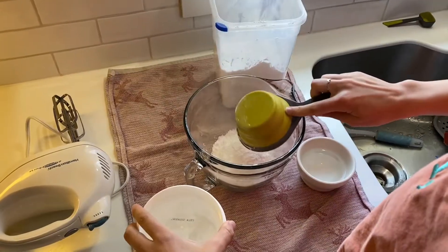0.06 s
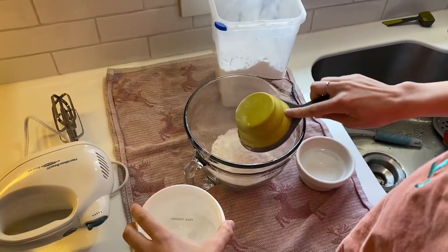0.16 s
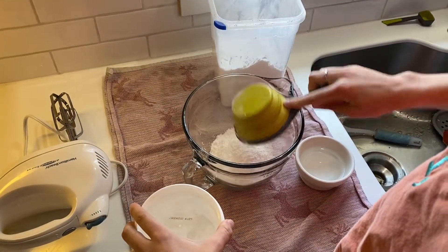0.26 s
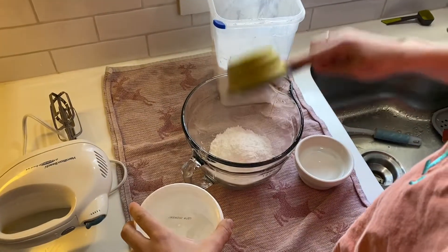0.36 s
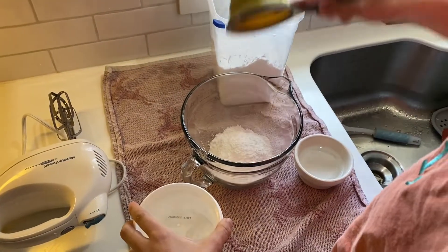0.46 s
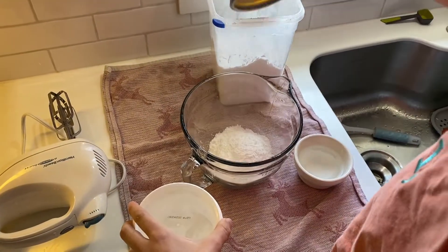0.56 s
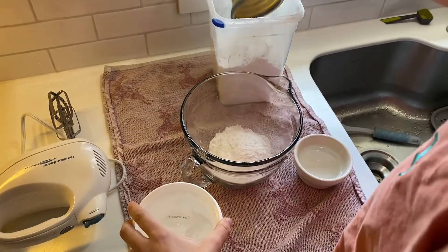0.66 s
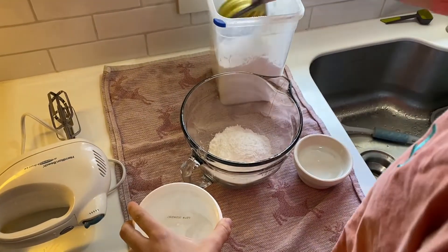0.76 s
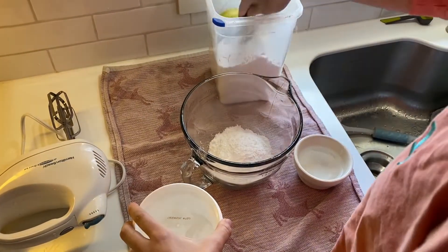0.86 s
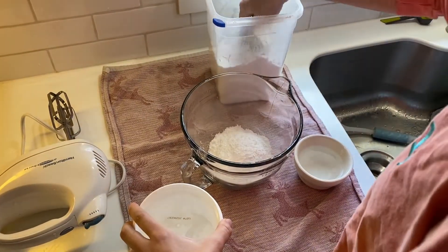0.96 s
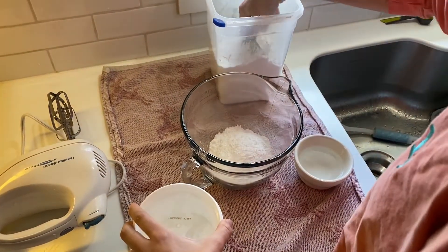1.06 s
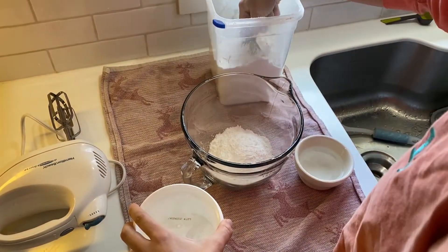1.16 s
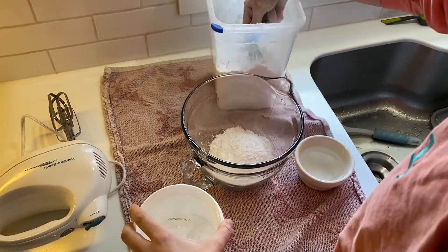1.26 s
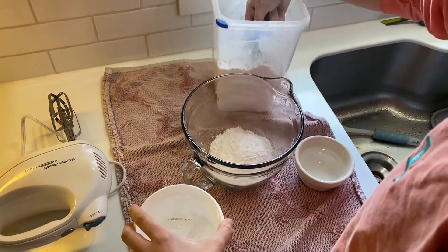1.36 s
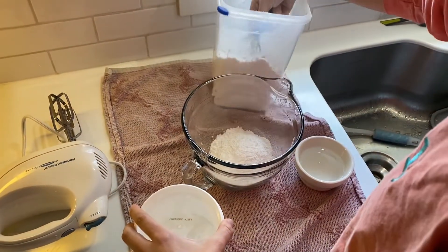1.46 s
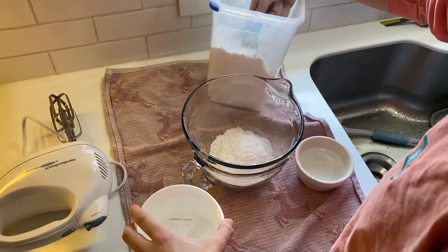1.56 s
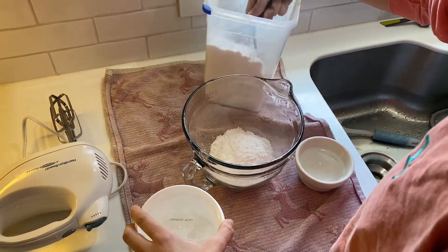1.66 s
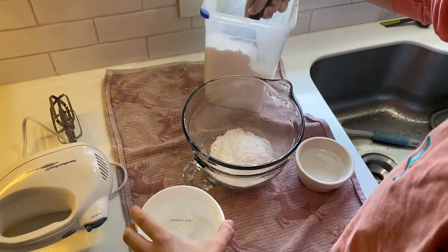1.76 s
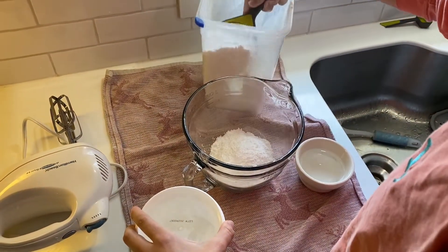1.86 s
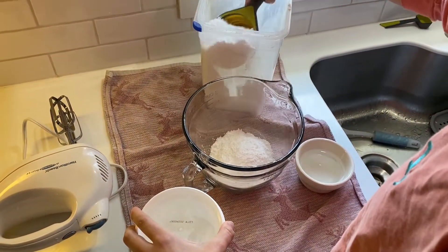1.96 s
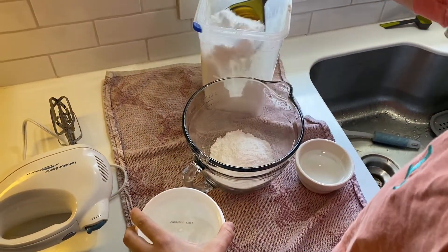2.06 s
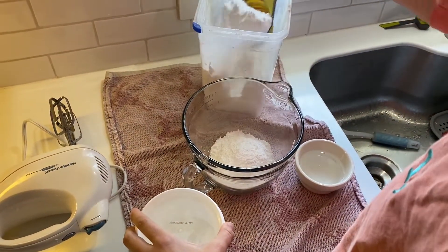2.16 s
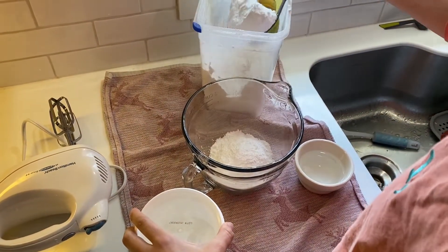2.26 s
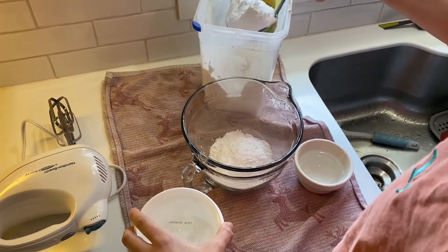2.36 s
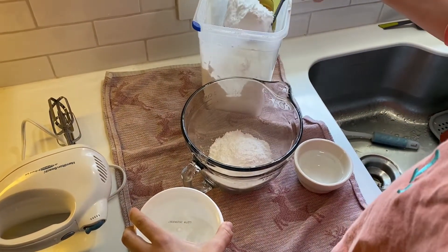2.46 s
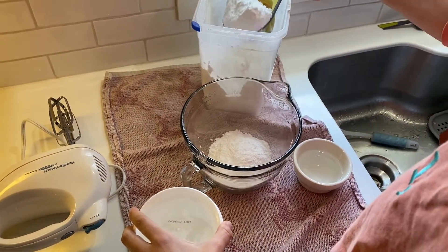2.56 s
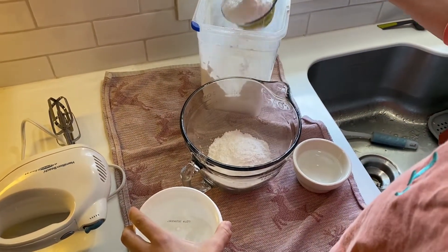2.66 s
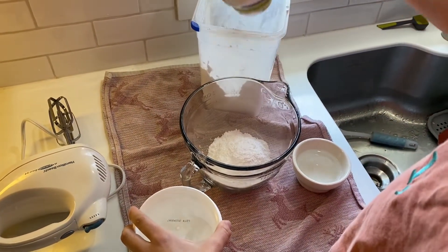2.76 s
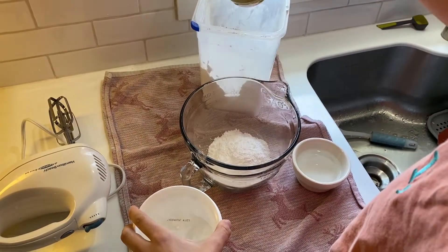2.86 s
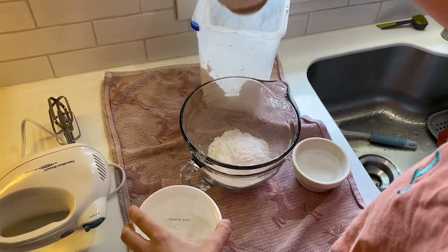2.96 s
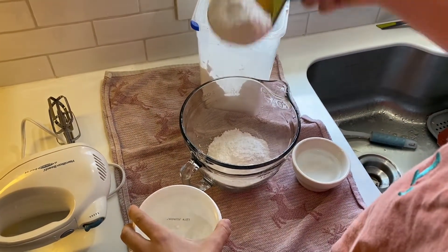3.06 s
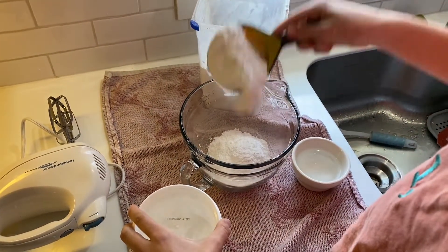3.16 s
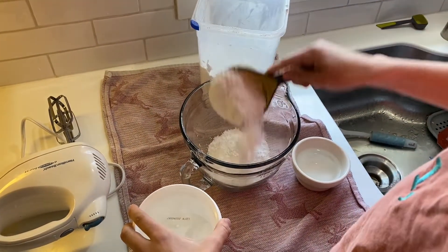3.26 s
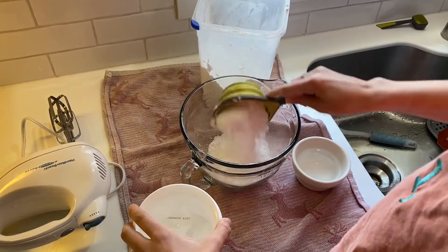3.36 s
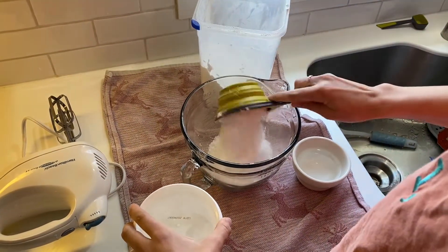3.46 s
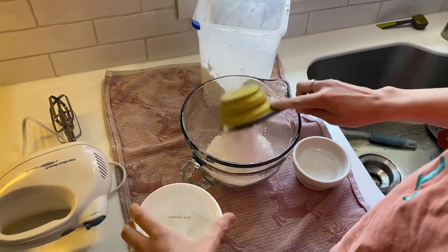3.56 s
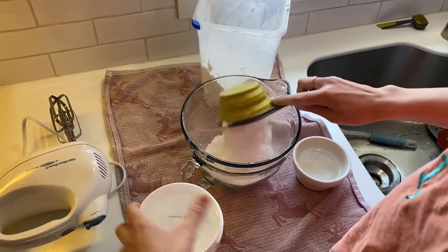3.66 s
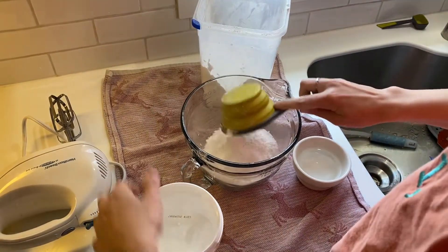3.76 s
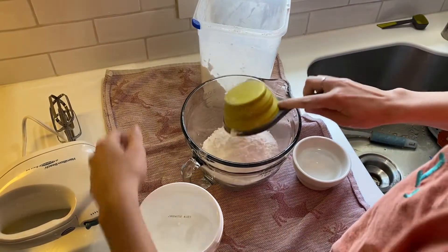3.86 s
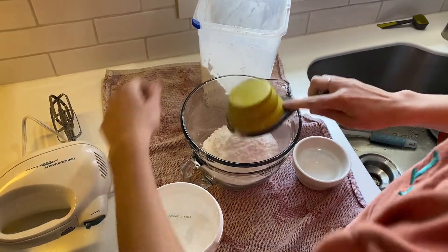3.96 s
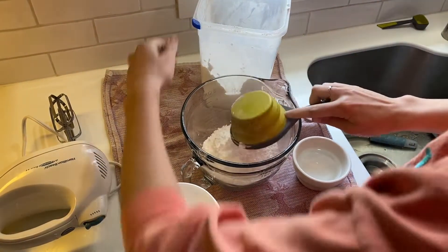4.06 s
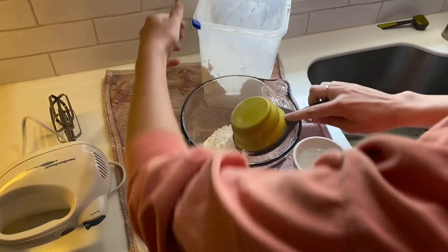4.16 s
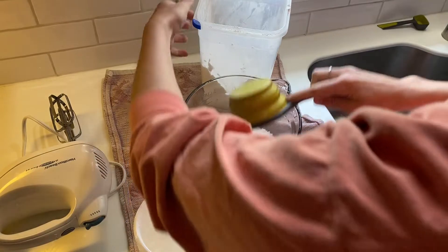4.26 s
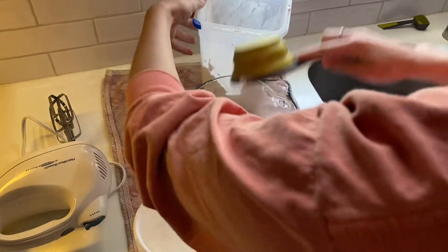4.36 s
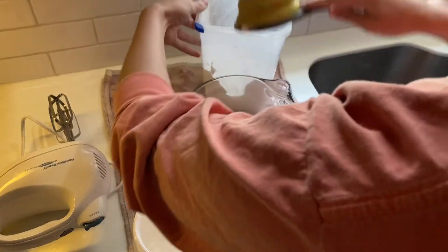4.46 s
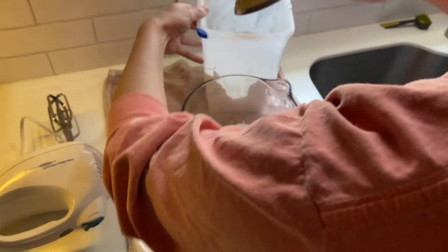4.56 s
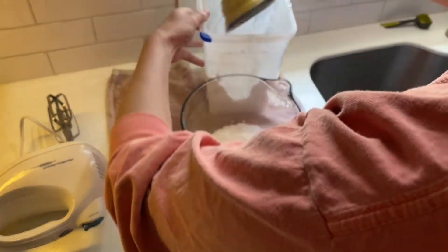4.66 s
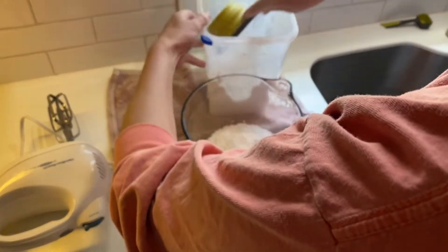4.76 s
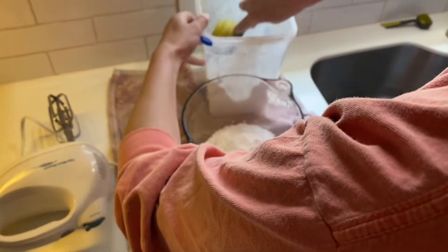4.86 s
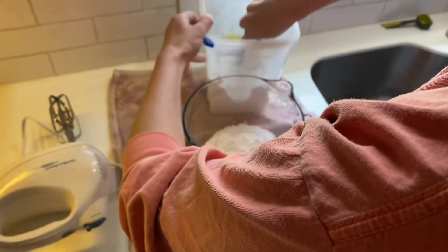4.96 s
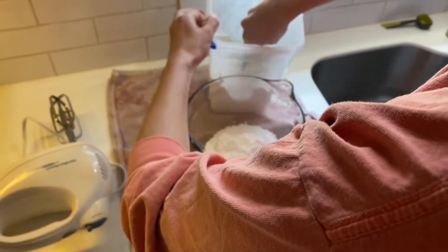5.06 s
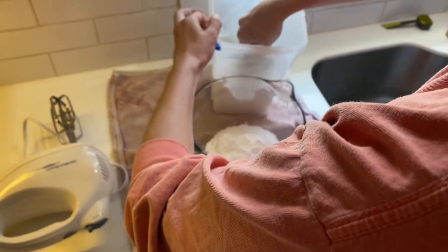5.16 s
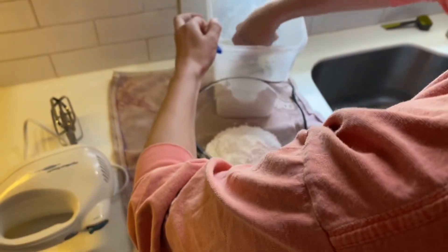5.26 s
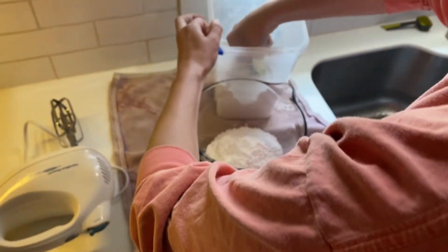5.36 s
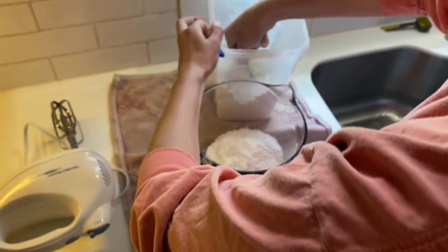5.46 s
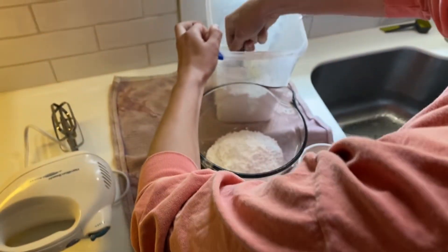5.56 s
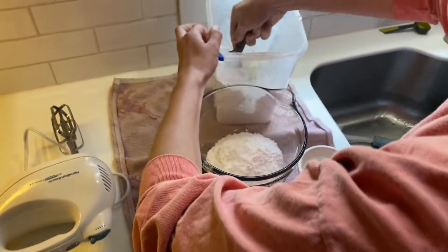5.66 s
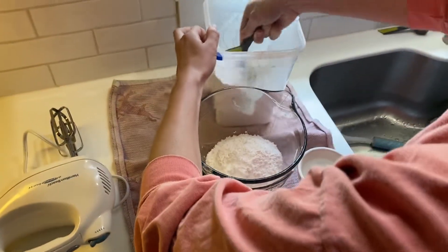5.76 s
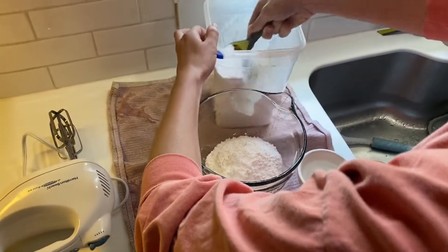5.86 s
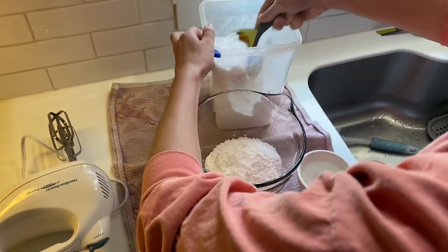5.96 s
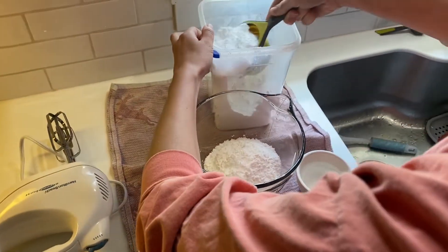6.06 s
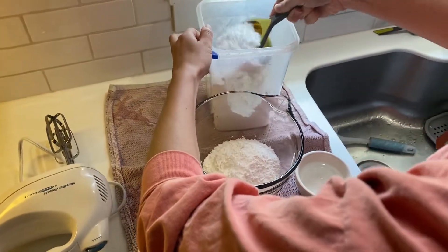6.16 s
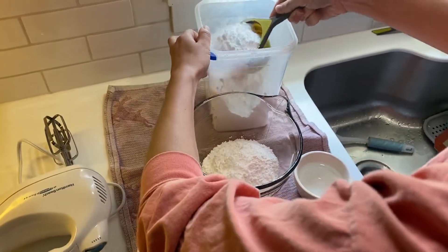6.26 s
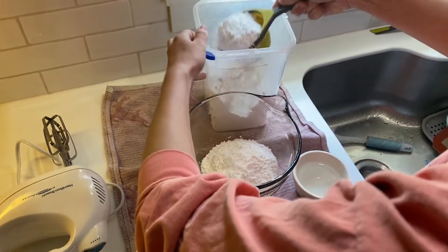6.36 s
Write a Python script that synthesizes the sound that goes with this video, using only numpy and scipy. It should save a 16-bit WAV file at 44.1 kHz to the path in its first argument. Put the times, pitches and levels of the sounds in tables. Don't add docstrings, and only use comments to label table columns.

```python
import sys
import numpy as np
from scipy import signal
from scipy.fft import rfft, irfft, next_fast_len
from scipy.io import wavfile
from scipy.ndimage import uniform_filter1d

SR = 44100
rng = np.random.default_rng(int(sys.argv[2]) if len(sys.argv) > 2 else 0)


def boost_factor(decibels):
    exponent = np.asarray(decibels, float) / 20
    return 10 ** exponent


def to_wav(sig):
    pcm = np.clip(np.atleast_2d(sig), -1, 1) * 32767
    pcm = np.round(pcm).astype(np.int16)
    wavfile.write(sys.argv[1], SR, pcm.T)


N = 282240
M = next_fast_len(N + 4096)
HZ = np.fft.rfftfreq(M, 1 / SR)

# pitch in Hz, time to fade by 60 dB in seconds,
# left minus right in dB, left lead in radians, level in dB.
COUNTER_MODES = [(47.2, 0.6, 0.5, 0.17, -1), (72.8, 0.43, 3, 0.061, 4), (83, 0.3, 2, .05, -2),
                 (112.2, 0.65, 4, .05, -5.5)]
# pitch in Hz, level in dB per Hz.
HISS_COLOUR = [(2000, -15), (3500, -9.5), (5200, -4), (6600, -4), (8200, -11), (9400, -4), (11400, -4.5),
               (12300, -4.5), (15000, 1.5), (16200, -27.5)]
RING_WET_DB = -7.5


def along(table):
    hz, value = np.transpose(table)
    return np.interp(np.log(HZ + 1), np.log(hz + 1), value)


def unit(x):
    return x / np.sqrt(np.mean(x ** 2))


def noise(colour, source=None):
    if source is None:
        source = rng.standard_normal(N)
    return unit(irfft(rfft(source, M) * boost_factor(along(colour)), M)[:N])


def walk(rate):
    hold = int(SR / rate)
    levels = np.repeat(rng.standard_normal(N // hold + 1), hold)[:N]
    return unit(uniform_filter1d(levels, hold))


def add(out, s, sound):
    i = int(s * SR)
    out[..., i:i + sound.shape[-1]] += sound[..., :N - i]


def ring(modes, db, rise_s, last=0.93, waver_db=0):
    waver_rate, waver_full_hz = 35, 2500
    hz, t60, pan_db, lead = np.transpose(modes)[:4]
    t = np.arange(int(min(last * max(t60), .62) * SR)) / SR
    turn = np.outer(2j * np.pi * hz - np.log(1000) / (last * t60), t)
    if waver_db:
        knots = np.arange(1, waver_rate)
        luck = rng.standard_normal((len(hz), len(knots), 2)) @ [1, 1j]
        luck = luck * np.minimum(hz / waver_full_hz, 1)[:, None] ** 2
        between = np.clip(1 - np.abs(t * waver_rate - knots[:, None]), 0, 1)
        turn = turn + waver_db * np.log(10) / 20 * luck @ between
    weight = np.array([boost_factor(db + side * pan_db / 2) * np.exp(.5j * side * lead) for side in (1, -1)])
    return (weight @ np.exp(turn)).imag * (1 - np.exp(-t / rise_s))


def bursts(times, db, rise_s, t60):
    out, t = np.zeros(N), np.arange(SR // 5) / SR
    shape = (1 - np.exp(-t / rise_s)) * boost_factor(-60 * t / t60)
    for s, gain in zip(times, boost_factor(db)):
        add(out, s, gain * shape)
    return out


def ports(x):
    # pitch in Hz, left lead in radians.
    port_lead = [(20, 0), (430, .3), (1200, 1.1), (2400, .7), (4500, 1.5), (7000, 1.7), (9300, 1.6),
                 (10400, .3), (11600, -.4), (12800, -2.4), (16000, -2.6)]
    turn = np.exp(.5j * along(port_lead))
    left = irfft(rfft(x, M) * turn, M) * boost_factor(2.05)
    right = irfft(rfft(x, M) / turn, M) * boost_factor(1.0)
    return np.array([left, right])[:, :N]


def room(x):
    # pitch in Hz, time to fade by 60 dB in seconds.
    echo_t60 = [(100, 0.39), (500, 0.39), (2000, 0.37), (6000, 0.34), (14000, 0.23)]
    at_hz, fade_s = np.transpose(echo_t60)
    t, tail = np.arange(SR // 2) / SR, 0
    for hz in 90 * 2. ** np.arange(8):
        band = signal.butter(2, [hz / 1.41, hz * 1.41], "bandpass", fs=SR, output="sos")
        mid, side = rng.standard_normal((2, len(t)))
        both = mid + min(hz / 900, 1) * side * np.array([[1], [-1]])
        t60 = np.interp(np.log(hz), np.log(at_hz), fade_s)
        tail = tail + signal.sosfilt(band, both) * boost_factor(-60 * t / t60)
    tail = tail * np.clip(t / 0.011, 0, 1)
    tail = tail / np.sqrt(np.sum(tail ** 2) / 2)
    return signal.fftconvolve(x[None], tail, axes=1)[:, :N]


def kitchen():
    # pitch in Hz, level in dB per Hz.
    air_colour = [(15, -52), (28, -27), (55, -1), (120, -8), (240, -6), (400, -13.5), (600, -20.5),
                  (1000, -24), (1400, -31.5), (1800, -41.5), (3000, -44.5), (6500, -48.5), (9000, -55),
                  (12000, -56), (14000, -64)]
    # pitch in Hz, likeness from 0 to 1.
    air_alike = [(40, 0.4), (130, 1), (290, 0.4), (640, 0.05), (16000, 0)]
    # pitch in Hz, rms level in dB, width in Hz.
    hums = [(63, -67.5, 11), (237.7, -61.5, 6.6), (608, -81, 0.5)]
    # start in seconds, end in seconds, level in dB.
    fan_runs = [(0.207, 1.65, -68.5), (2.37, 3.5, -64.5), (4.665, 6.6, -65.5)]
    fan_hz, fan_waver_hz, fan_fade_s, fan_idle_db = 398, 1.8, 0.13, -80.5

    t = np.arange(N) / SR
    alike = np.clip(along(air_alike), 0, 1)
    spectra = rfft(rng.standard_normal((2, M))) * boost_factor(along(air_colour))
    mid, side = spectra * np.sqrt([1 + alike, 1 - alike])
    air = unit(irfft(np.array([mid + side, mid - side]), M)[:, :N])
    sound = air * boost_factor(-58 + 0.72 * walk(2.0))

    for hz, db, width_hz in hums:
        waver = np.cumsum(width_hz / 2 * walk(8.2)) / SR
        sound = sound + np.sqrt(2) * boost_factor(db + 2.2 * walk(6.6)) * np.sin(2 * np.pi * (hz * t + waver))

    fan_db = fan_idle_db
    for start, end, db in fan_runs:
        present = np.clip(np.minimum(t - start, end - t) / fan_fade_s + .5, 0, 1)
        fan_db = fan_db + (db - fan_idle_db) * present
    cycles = np.cumsum(fan_hz + fan_waver_hz * walk(3.4)) / SR
    sound = sound + np.sqrt(2) * boost_factor(fan_db + 2.9 * walk(2.7)) * np.sin(2 * np.pi * cycles)
    return sound * boost_factor(np.array([[.7], [-.7]]))


def taps():
    # start in seconds, then crack, edge, clank and foot levels in dB.
    rim_taps = [
        (.0015, -17.5, -28.5, -26, -17),
        (0.1431, -14.5, -30, -27, -13),
        (3.5859, -20, -43, -30.5, -15.5),
        (4.035, -31.5, -51, -47.5, -22),
        (4.122, -20.5, -36.5, -30, -13),
    ]
    # pitch in Hz, time to fade by 60 dB in seconds.
    bowl = [(581.5, .72), (620, .55), (1472.5, .8), (1501, .62), (2628.5, .4), (2696, .36)]
    # pitch in Hz, time to fade by 60 dB in seconds.
    cup = [(3784, .31), (4235, .26), (4776, .43), (6099, .18), (6444, .22)]
    # pitch in Hz, time to fade by 60 dB in seconds,
    # left minus right in dB, left lead in radians.
    shimmer = [(1038, .25, 3, .6), (1657, .22, 1, -1.4), (1720, .22, -3, 1.6), (4288, .18, -6, -.6),
               (5515, .24, 0, .2), (5865, .33, 3, 1.3), (6200, .25, -6, -1.9), (6729, .27, 0, -1.1),
               (7600, .26, -5, -.9), (7720, .22, -6, .3), (8270, .18, 0, 3.1), (8680, .2, 0, 3.0),
               (8882, .18, -4, 1.6), (9315, .2, -2, 1.5), (9410, .19, -2, 1.4), (9510, .2, 0, 1.7),
               (10400, .15, 0, 0), (10800, .21, 0, 0), (11370, .1, 0, 0), (11750, .19, -3, -.8),
               (12350, .14, 0, -2.2), (4795, .4, -4, 1.9), (6472, .22, -2, -.4), (7642, .25, -2, .1)]
    struck_db = [(-42, -51, -45, -71, -57), (-42, -43, -43, -50, -48), (-46, -33, -42, -52, -49),
                 (-31, -34, -43, -38, -35), (-36, -57, -39, -62, -48), (-52, -30.5, -37, -39, -32),
                 (-40, -38, -55, -57, -43), (-44, -43, -62, -64, -50), (-66, -52, -67, -60, -51),
                 (-39, -44, -50, -69, -52), (-42, -42, -56, -67, -55)]
    shimmer_struck_db = [(-42, -45, -49, -53, -48), (-43, -41, -55, -61, -45), (-45, -39, -60, -60, -48),
                         (-45, -46, -53, -58, -41), (-48, -47, -56, -77, -50), (-54, -53, -57, -94, -72),
                         (-62, -53, -60, -66, -53), (-52, -49, -56, -70, -63), (-58, -54, -68, -67, -58),
                         (-55, -62, -57, -72, -63), (-75, -51, -78, -84, -66), (-71, -46, -68, -72, -63),
                         (-66, -64, -65, -75, -59), (-58, -54, -74, -79, -66), (-57, -67, -76, -87, -110),
                         (-62, -53, -65, -86, -90), (-55, -49, -73, -88, -57), (-53, -50, -74, -120, -70),
                         (-60, -47, -65, -80, -96), (-70, -64, -75, -92, -81), (-62, -59, -72, -86, -70),
                         (-68, -62, -74, -72, -54), (-55, -53, -58, -70, -51), (-46, -61, -75, -77, -63)]
    struck_pan_db = [(0, -7, -1, 3, 1), (10, 5, 0, -4, 4), (1, 4, 8, 12, 12), (1, -3, 0, 1, 0),
                     (8, -4, 6, 12, 1), (-1, 0, 2, -2, -6), (-3, -3, 2, -2, -1), (-1, -4, -12, -4, -12),
                     (-7, -7, 9, -4, 10), (1, -3, 0, 9, 5), (2, 4, 2, -2, 0)]
    struck_lead = [(.7, 1, -.1, 1.6, .4), (.1, -2.4, .3, 1, 2.2), (-2.4, -1.2, -.6, -.7, -2.6),
                   (1.1, .6, 1.6, 1.2, 1.2), (1.2, 2.9, -1.2, -2.4, 2.4), (.9, .1, .5, .8, 1.2),
                   (0, 0, -1.5, 2.1, 1.7), (1.3, 1.2, 0, -1.9, 2), (-1.1, 1.5, 2.5, 2.1, 2),
                   (-.7, -1.9, -1.8, -2.3, -.9), (-1.5, .5, -.2, .2, .7)]
    ring_length = [1, 1, .92, 1, .8]
    clank = [(4206, 0.03, -10, .8, 1.5), (2675, 0.042, 0.5, .5, -8.5), (4780, .05, -4, 1, -15),
             (6300, 0.063, 0, .5, -16), (7660, 0.049, -4, -0.71, -20), (9340, .035, -1.5, 1.6, -16.5),
             (10810, .03, -0.5, 0, -18.5), (11550, 0.046, 0.5, 0, -23.5)]
    foot = [(198, 0.087, 2, 0.083, -18), (230, 0.14, 2, 0.092, -36), (355, 0.2, 2, .2, -26.5)]
    # pitch in Hz, level in dB per Hz.
    crack_colour = [(90, -19), (200, -14.5), (330, -15.5), (510, 0), (1000, -3), (1600, -3), (2100, -10),
                    (3300, -20.5), (5200, -25), (7500, -34), (11000, -67.5)]
    # pitch in Hz, level in dB per Hz.
    edge_colour = [(2500, -12), (3300, -9.5), (4500, -9), (7000, -4), (8200, -14), (11000, -18.5),
                   (12500, -26.5), (13000, -62.5)]
    # delay in seconds, level in dB.
    chatter = [
        (0, 0),
        (.0032, 0),
        (.0056, 0),
        (.009, -5.5),
    ]
    waver_db, stop_t60 = 3.5, .012

    out, rings = np.zeros((2, N)), np.zeros((2, N))
    t = np.arange(N) / SR
    strong_db, weak_db = np.transpose(struck_db) + 1.5, np.transpose(shimmer_struck_db)
    pans, leads = np.transpose(struck_pan_db), np.transpose(struck_lead)
    for k, (s, crack_db, _, clank_db, foot_db) in enumerate(rim_taps):
        strong = np.column_stack([bowl + cup, pans[k], leads[k]])
        rings = rings * boost_factor(-60 * np.clip((t - s) / stop_t60, 0, 2))
        add(rings, s, ring(strong, strong_db[k], 0.001, ring_length[k], waver_db))
        add(rings, s, ring(shimmer, weak_db[k], 0.001, ring_length[k], waver_db))
        add(out, s, ring(clank, np.array(clank)[:, 4] + clank_db + 3.5, 0.00075))
        add(out, s, ring(COUNTER_MODES, np.array(COUNTER_MODES)[:, 4] + crack_db - 19.5, .008))
        add(out, s, ring(foot, np.array(foot)[:, 4] + foot_db, 0.001))

    s, crack_db, edge_db, *_ = np.transpose(rim_taps)
    rattle = sum(bursts(s + delay_s, crack_db + db - 3.5, 0.00097, 0.012) for delay_s, db in chatter)
    crack = noise(crack_colour) * rattle + noise(edge_colour) * bursts(s, edge_db, 0.00014, 0.032)
    bodies = (boost_factor(RING_WET_DB) * out + boost_factor(-18) * rings).mean(axis=0)
    return out + rings + ports(crack), boost_factor(-8.0) * crack + bodies


def knocks():
    # start in seconds, then boom, hollow, wall and tick levels in dB.
    firm = [(0.703, -55, -30, -36, -62), (0.797, -39, -22.5, -24.5, -34), (0.871, -63, -44, -72, -63),
            (1.288, -41, -46.5, -56, -84), (2.271, -50.5, -47.5, -62, -85), (3.3, -48.5, -48.5, -42.5, -71),
            (4.794, -67, -47, -41, -72), (4.811, -63, -35.5, -56, -71), (4.817, -47, -30.5, -49, -72),
            (5.056, -42, -33, -37.5, -81.5), (5.654, -57, -50, -47, -58), (5.893, -64, -49.5, -53, -73)]
    # start in seconds, then body, wall and tick levels in dB.
    light = [(1.595, -53, -70, -62), (1.626, -71, -68, -70), (1.69, -64, -83, -62), (1.745, -50, -58, -75),
             (1.805, -62, -58, -75), (1.872, -56, -59, -57), (1.933, -59, -62, -61),
             (2.658, -61, -56.5, -75), (3.253, -48, -55, -71), (3.348, -47, -62, -73),
             (3.461, -48.5, -58.5, -97.5), (4.425, -64, -49, -81), (5.408, -65, -59, -82),
             (5.547, -60, -76, -88), (6.05, -54.5, -61, -80), (6.103, -66, -76, -81),
             (6.228, -52.5, -66, -83)]
    # start in seconds, wall level in dB, tick level in dB.
    grazes = [
        (.553, -81, -74.5),
        (4.011, -56, -64),
    ]
    tub = [(168, 0.088, 2, 0.3, -5), (210, 0.07, 2, .25, 2), (271.8, 0.1, 1.8, 0.33, -0.5),
           (350.4, 0.063, 0.96, 0.32, 1), (426, 0.11, 1.5, 0.89, -5), (499, 0.077, 4.5, .6, -5.5)]
    panel = [(847, 0.058, 2.4, .6, -4.5), (1051, 0.091, 1.5, 0.65, -5), (1316, 0.052, 1.5, .9, -8.5),
             (1900, 0.034, 0.34, 0.74, -4.5)]
    # start in seconds,
    # pitch in Hz, level in dB, time to fade by 60 dB in seconds.
    dents = [(0.703, 1743, -42, 0.007), (0.706, 195, -34.5, 0.06), (.798, 1072, -30.5, 0.042),
             (1.242, 910, -55, 0.023), (1.29, 210, -35, 0.032), (1.595, 1900, -47, 0.01),
             (1.626, 1900, -52, 0.0099), (1.804, 1620, -44, 0.028), (1.814, 2830, -47, 0.017),
             (1.847, 2800, -49, 0.013), (1.871, 1800, -41, .015), (1.884, 1710, -49, .015),
             (1.898, 3370, -43, 0.011), (2.269, 1450, -57, 0.019), (2.276, 193, -33, 0.037),
             (3.256, 2790, -57, 0.017), (3.276, 1390, -55, 0.032), (3.304, 1364, -51, 0.053),
             (3.352, 3500, -59, 0.0093), (3.464, 785, -44.5, 0.016), (4.798, 1460, -32, 0.012),
             (4.796, 414, -35, 0.1), (4.814, 1120, -39.5, 0.022), (4.817, 230, -22.5, 0.03),
             (4.822, 2500, -32.5, 0.004), (4.898, 1400, -57, .02), (5.056, 875, -22, 0.0093),
             (5.061, 230, -24.5, 0.043), (5.592, 2500, -52, .012), (5.655, 2330, -32, 0.005),
             (5.655, 3270, -42.5, 0.0057), (5.82, 2240, -56, .015), (5.876, 1710, -45, 0.022),
             (5.893, 1570, -42, 0.012), (5.907, 1300, -46, 0.019), (5.911, 2610, -49, 0.024),
             (6.052, 1490, -76, 0.013)]
    # pitch in Hz, level in dB per Hz.
    wall_colour = [(300, -24), (520, 1), (780, -8), (1080, -3.5), (1500, -4), (2000, -13), (2700, -11.5),
                   (3300, -20), (5000, -22.5), (8000, -69)]
    body_lag_s = 0.00525
    faint_db = -52
    dent_pan_db, dent_lead, dent_rise_cycles = 4, 0.7, 0.29

    touches = [(at, db, db, *rest) for at, db, *rest in light]
    s, boom_db, hollow_db, wall_db, tick_db = np.transpose(sorted(firm + touches))
    is_boom = np.transpose(tub)[0] < 240
    body = np.where(is_boom, boom_db[:, None], hollow_db[:, None])
    body = body - 12 / (1 + boost_factor(3.4 * (body - faint_db)))
    out = np.zeros((2, N))
    for at, db in zip(s, body + 1.2 * rng.standard_normal(body.shape)):
        add(out, at + body_lag_s, ring(tub, np.array(tub)[:, 4] + db + 7.0, 0.0034, 0.51))
    for at, db in zip(s, wall_db):
        luck = rng.standard_normal(len(panel))
        add(out, at, ring(panel, np.array(panel)[:, 4] + db - 9.5 + 1.7 * luck, 0.00039))
    for at, hz, db, t60 in dents:
        mode = (hz, t60, dent_pan_db, dent_lead * min(hz / 1000, 1.5))
        add(out, at, ring([mode], db, dent_rise_cycles / hz))

    graze_s, graze_wall_db, graze_tick_db = np.transpose(grazes)
    s = np.append(s, graze_s)
    clack = noise(wall_colour) * bursts(s, np.append(wall_db, graze_wall_db) + 5.0, 0.0015, 0.019)
    tick = noise(HISS_COLOUR) * bursts(s, np.append(tick_db, graze_tick_db) + 6.0, 0.00035, 0.015)
    return out + ports(clack + tick), boost_factor(-4.0) * (clack + tick) + boost_factor(-7.5) * out.mean(axis=0)


def stroke(t, length, settle_t60):
    attack_s = 0.016
    attack = np.clip(t / attack_s + 1, 0, 1) ** 2
    return attack * boost_factor(-60 * np.clip(t - length, 0, None) / settle_t60)


def powder():
    # start in seconds, length in seconds, rasp level in dB,
    # hiss level in dB, swell in dB by its end.
    strokes = [(0.721, 0.059, -56, -65, -17), (0.805, 0.02, -35.5, -76, -35),
               (0.868, 0.033, -44.5, -57.5, -17), (1.176, 0.053, -91, -79, 12),
               (1.251, 0.032, -68.5, -59, -1), (1.465, 0.12, -91.5, -79, 26), (1.602, .01, -63, -70, -3),
               (1.625, 0.041, -75, -71.5, -3), (1.681, 0.047, -71, -77, 11), (1.751, 0.16, -63, -67, 7.5),
               (1.938, 0.0089, -58.5, -70.5, -1.5), (2.657, 0.0068, -66.5, -90, -2.5),
               (3.252, 0.052, -67, -79, 10), (3.332, 0.14, -84, -98, 4), (3.826, 0.27, -104, -88.5, 6.5),
               (4.315, 0.054, -64.5, -78.5, -14), (4.433, 0.16, -58, -86, -24), (4.808, 0.018, -59, -77, 0),
               (4.816, 0.26, -65.5, -72.5, 5), (5.139, 0.11, -66, -74.5, 3.5),
               (5.547, 0.08, -62, -71.5, -0.5), (5.663, 0.18, -54, -79, -30), (5.782, 0.12, -68, -72.5, 14),
               (5.913, 0.033, -61, -74.5, 3)]
    # pitch in Hz, width in Hz, level in dB.
    scoop = [(890, 790, 5.5), (1440, 600, -10), (1800, 480, -1.5), (2220, 380, -9), (2713, 550, -11.5),
             (3270, 1000, -3), (4400, 1300, -3.5), (6640, 1100, -6.5)]
    rasp_settle_t60, hiss_settle_t60 = 0.086, 0.17

    rasp, hiss = np.zeros(N), np.zeros(N)
    near = np.arange(SR // 2) / SR - .03
    for s, length, rasp_db, hiss_db, swell_db in strokes:
        swell = swell_db * np.clip(near / length, 0, 1)
        add(rasp, s + near[0], boost_factor(rasp_db + swell) * stroke(near, length, rasp_settle_t60))
        add(hiss, s + near[0], boost_factor(hiss_db + 0.31 * swell) * stroke(near, length, hiss_settle_t60))

    grains = rng.standard_normal((2, N)) * boost_factor(1.8 * rng.exponential(size=(2, N)))
    grit, catch = rfft(grains[0], M), 0
    for hz, width_hz, db in scoop:
        peak = 1 / (1 + (2 * (HZ - hz) / width_hz) ** 2)
        catch = catch + boost_factor(db + 3.8 * walk(45)) * unit(irfft(grit * peak, M)[:N])
    scrape = rasp * boost_factor(-1.0) * unit(catch) * boost_factor(1.3 * walk(80))
    sift = hiss * boost_factor(1.0 + 4.4 * walk(45)) * noise(HISS_COLOUR, grains[1])
    x = scrape + sift
    return boost_factor(-2.0) * ports(x), boost_factor(-11.0) * x


def thumps():
    # start in seconds, level in dB.
    rocks = [
        (0.737, -34),
        (2.274, -47.5),
        (4.86, -42),
        (5.099, -43),
        (5.883, -41.5),
        (6.129, -48.5),
        (6.273, -47),
    ]
    low = COUNTER_MODES[:3]
    out = np.zeros((2, N))
    for s, db in rocks:
        add(out, s, ring(low, np.array(low)[:, 4] + db, 0.039, 0.51))
    return out, boost_factor(RING_WET_DB) * out.mean(axis=0)


def drags():
    # start in seconds, length in seconds, first pitch in Hz, last pitch in Hz, level in dB.
    lip_drags = [(0.858, 0.033, 3260, 3485, -56), (1.756, 0.046, 2000, 1590, -72),
                 (1.8, 0.15, 2750, 3290, -71), (1.83, 0.072, 1610, 1900, -72),
                 (3.27, 0.049, 1330, 1440, -66), (4.825, 0.028, 1466, 1480, -60),
                 (5.655, 0.065, 1075, 940, -65.5), (5.787, .11, 2360, 1670, -65.5),
                 (5.857, 0.13, 4280, 4130, -76), (5.884, .07, 2600, 2980, -64),
                 (5.89, 0.062, 1104, 1400, -66)]
    hold = int(SR / 520)
    out = np.zeros(N)
    for s, length, from_hz, to_hz, db in lip_drags:
        way = np.linspace(0, 1, int(length * SR))
        grit = rng.standard_normal((2, SR // 5))
        slip = uniform_filter1d(uniform_filter1d(grit, hold), hold)[:, :len(way)]
        spin = np.exp(2j * np.pi * np.cumsum(from_hz + (to_hz - from_hz) * way) / SR)
        tone = unit(((slip[0] + 1j * slip[1]) * spin).real)
        add(out, s, boost_factor(db) * tone * np.sqrt(np.abs(np.sin(np.pi * way))))
    return ports(out), boost_factor(-13.0) * out


def scene():
    floor = kitchen()
    direct, feed = zip(taps(), knocks(), powder(), thumps(), drags())
    return sum(direct) + room(sum(feed)) + floor


def low_pass(x):
    return signal.sosfilt(signal.butter(12, 16460, fs=SR, output="sos"), x)


def record(dry):
    # pitch in Hz, level in dB.
    phone_colour = [(12600, 0), (13150, -8), (13300, -26), (13750, -26), (13950, -6), (14500, 0),
                    (15720, -2), (15900, -40), (16500, -70)]
    mix = irfft(rfft(dry, M) * boost_factor(along(phone_colour)), M)[:, :N]
    return low_pass(mix)


dry = scene()
out = record(dry)
to_wav(out)
```